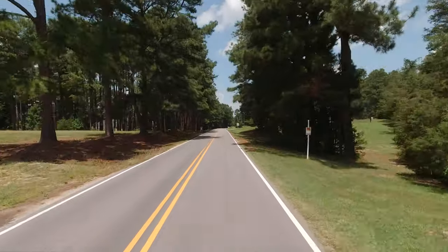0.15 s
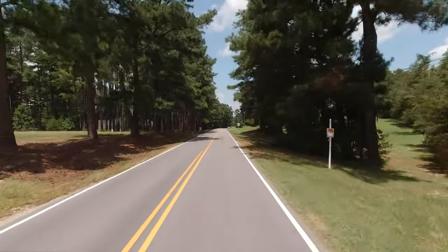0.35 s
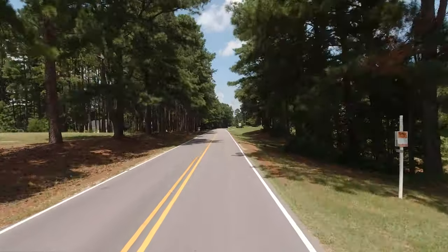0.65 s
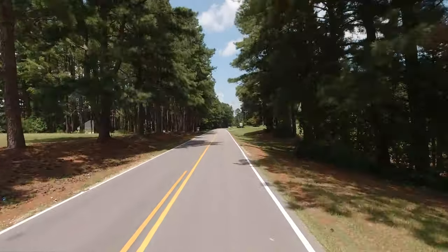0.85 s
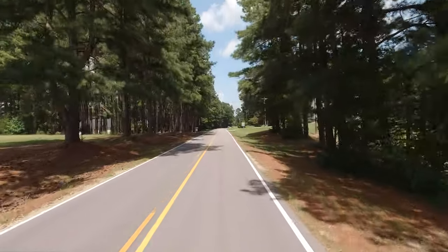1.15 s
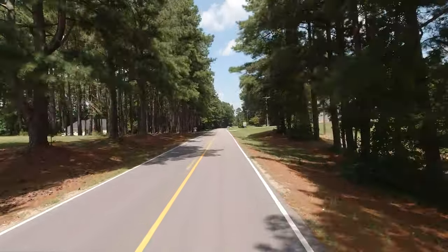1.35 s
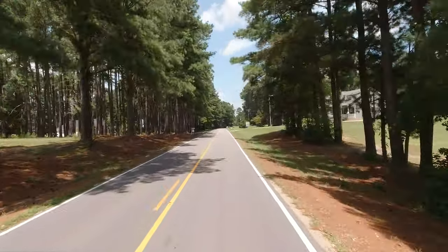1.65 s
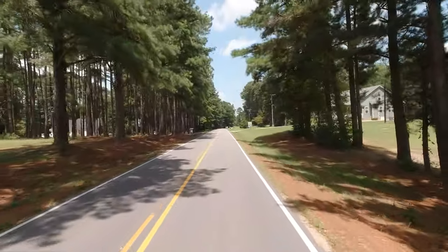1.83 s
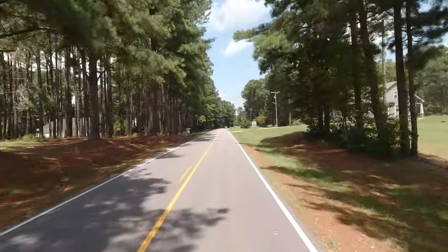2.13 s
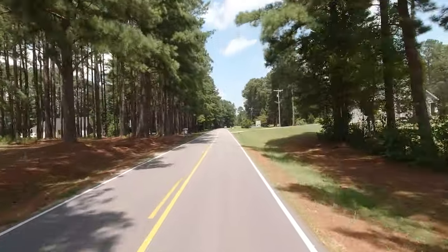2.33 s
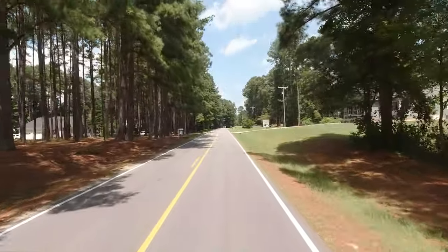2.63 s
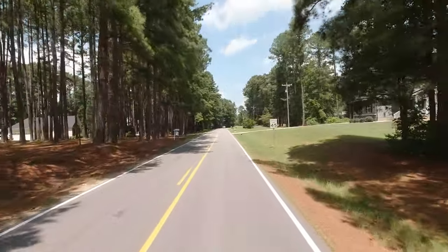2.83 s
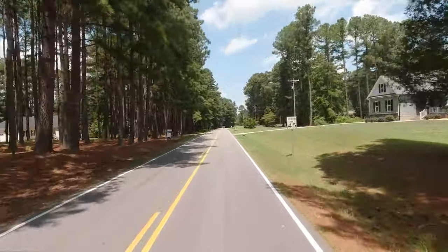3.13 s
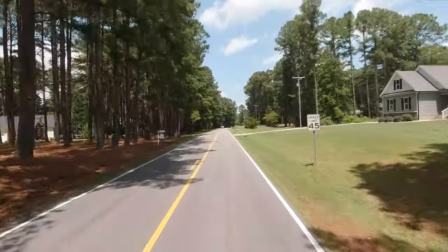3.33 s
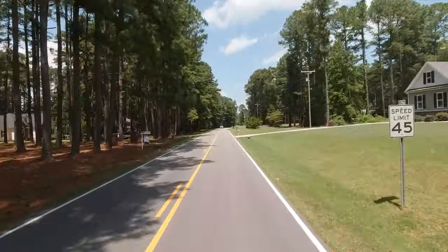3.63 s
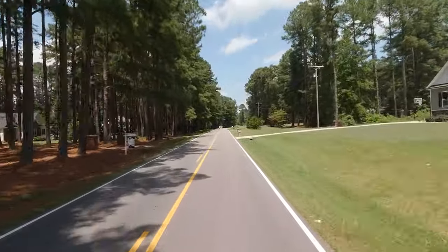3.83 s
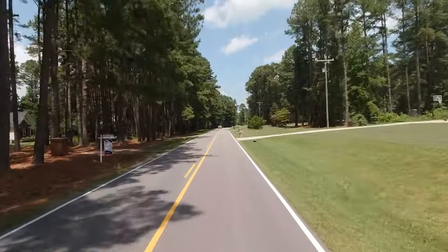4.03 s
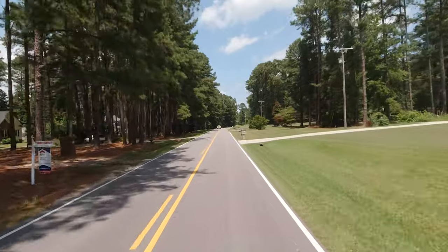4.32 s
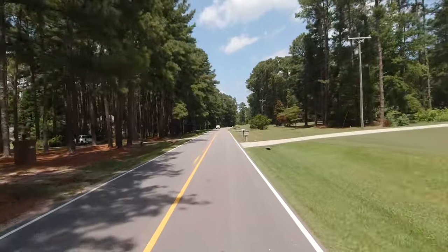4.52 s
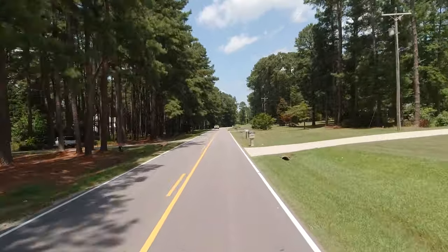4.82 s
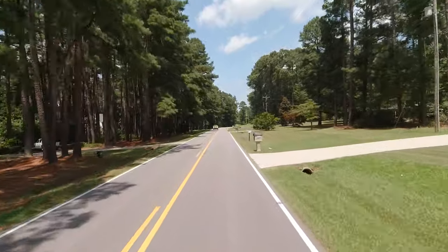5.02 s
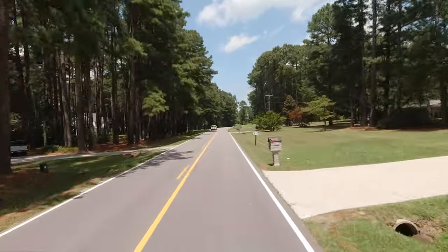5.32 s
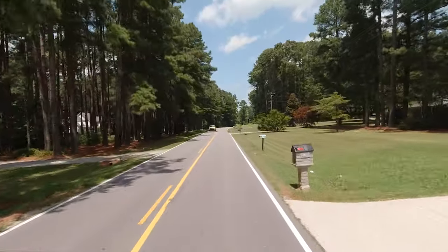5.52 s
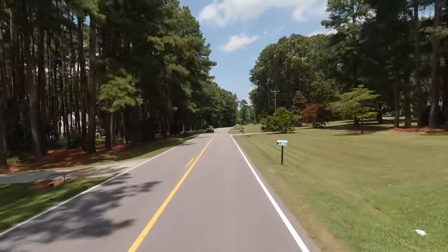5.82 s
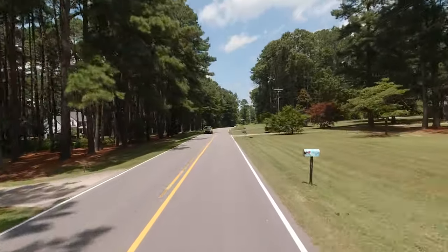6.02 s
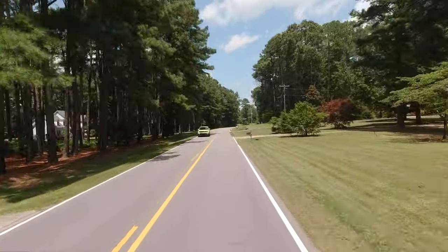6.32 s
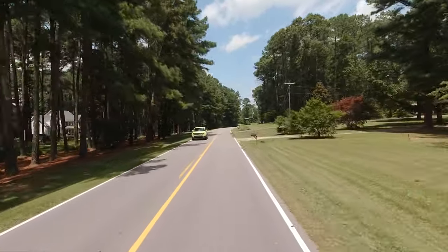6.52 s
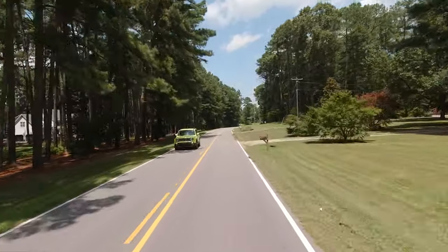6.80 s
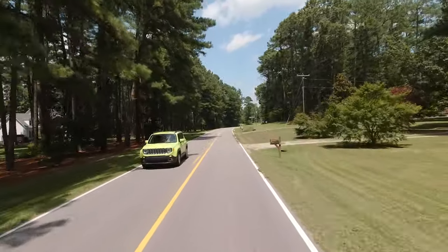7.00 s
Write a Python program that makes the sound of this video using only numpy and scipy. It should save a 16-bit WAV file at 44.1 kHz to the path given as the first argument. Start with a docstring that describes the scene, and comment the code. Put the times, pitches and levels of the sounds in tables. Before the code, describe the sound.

A low, pulsing wind throb and steady road boom fill a moving open vehicle as air rushes past the windows.

```python
"""Open-top drive on a country road

Heard from on board: air spilling past the open windows makes the cabin throb near 40 Hz.
Engine and road boom through the body, and the tyres roar and whine.
The slipstream rushes louder on the left and grows brighter; loose trim taps once and squeaks faintly."""
import sys
import numpy as np
from scipy import signal
from scipy.fft import rfft, irfft, next_fast_len
from scipy.io import wavfile
from scipy.ndimage import uniform_filter1d, map_coordinates

SR = 44100
rng = np.random.default_rng(int(sys.argv[2]) if len(sys.argv) > 2 else 0)


def log_audio(samples):
    """Write samples as a 16-bit WAV file to the path given in sys.argv[1]."""
    # one column per channel
    frames = np.atleast_2d(samples).T
    # limit to full scale, then quantise
    limited = np.clip(frames, -1, 1)
    pcm = np.round(limited * 32767).astype(np.int16)
    wavfile.write(sys.argv[1], SR, pcm)


N = 315756

# the deep throb, as the vortices lock on to the cabin and let go: (time [s], level [dB])
THROB_LEVEL = [(0.0, -19.5), (0.25, -29.5), (0.47, -19.5), (0.65, -26), (0.95, -24.5), (1.2, -18),
               (1.8, -20), (2.05, -32.5), (2.27, -18.5), (2.6, -25), (2.95, -36.5), (3.25, -18),
               (3.6, -20.5), (4.0, -20.5), (4.27, -16.5), (4.55, -22), (4.92, -27), (5.17, -22),
               (5.85, -23.5), (6.25, -25.5), (6.7, -16), (7.15, -24.5)]
# brief stalls when the vortices lose their lock: (time [s], width [s], gain [dB])
THROB_STALLS = [(0.72, 0.047, -12), (0.88, 0.03, -14), (1.23, 0.045, -9), (1.44, 0.13, -7),
                (1.96, 0.027, -16), (2.13, 0.053, -5), (2.42, 0.079, -10.5), (3.05, 0.042, -13),
                (3.79, .04, -12), (4.05, 0.066, -10.5), (4.36, 0.019, -10.5), (5.25, 0.045, -15),
                (6.02, 0.065, -15), (6.73, 0.032, -18), (6.84, 0.044, -17), (6.93, 0.071, -6)]
# the boom that shakes the body: (time [s], level [dB])
BOOM_LEVEL = [(0.0, -30.5), (0.7, -28), (1.75, -26.3), (2.0, -28), (2.2, -26.5), (3.0, -26.7), (3.4, -25.8),
              (4.0, -26.4), (4.27, -28), (4.55, -24.5), (4.75, -26), (5.45, -25.3), (5.82, -21.8),
              (6.08, -24), (6.25, -22.8), (6.95, -22.2), (7.15, -25)]
# tone of the boom: (frequency [Hz], level [dB])
BOOM_SPECTRUM = [(12, -24), (22, -1), (34, -0.5), (54, -4.5), (68, -2.5), (92, -4), (130, -7), (175, -9.5),
                 (205, -13), (300, -19.5), (400, -32), (700, -54.5), (3000, -120)]
# tyre roar on the changing asphalt: (time [s], level [dB])
ROAR_LEVEL = [(0.0, -43.5), (1.7, -42.5), (3.1, -42), (4.05, -41.5), (4.7, -42.5), (5.45, -40), (6.1, -41),
              (6.8, -42)]
# tone of the roar: (frequency [Hz], level [dB])
ROAR_SPECTRUM = [(40, -62.5), (130, -23.5), (220, -0.5), (300, 2), (400, -0.65), (600, -3.5), (900, -10.5),
                 (1200, -15), (1800, -25), (4000, -60.5), (12000, -120)]
# the tyre whine follows the road speed: (time [s], pitch [Hz])
WHINE_PITCH = [(0.0, 840), (1.0, 848), (2.5, 855), (3.9, 849), (5.5, 857), (7.15, 866)]
# tread notes: (multiple of the pitch, width [Hz], level against the roar [dB], left minus right [dB])
WHINE_NOTES = [(0.652, 16, -12.5, 1.5), (0.978, 45, -13, 2), (1.008, 28, -14, 6), (2.01, 40, -21, 7.5)]
# the whine flares or sinks with the grain of the road: (time [s], width [s], gain [dB])
WHINE_SWELLS = [(0.1, 0.4, -3), (2.15, 0.11, 4), (3.15, 0.5, 1.5), (5.1, 0.23, 3), (5.8, 0.7, -1.5)]
# strength of the airflow past the vehicle: (time [s], gain [dB])
AIRFLOW = [(0.0, 1.2), (0.9, -1.3), (2.3, -0.5), (2.9, 0), (3.45, 0.7), (4.7, 0), (5.15, 1.1), (5.45, 2.0),
           (6.3, 1.3), (6.6, 2), (6.9, 2.5), (7.15, 4)]
# gusts and lulls in the slipstream, and one very short burst of noise: (time [s], width [s], gain [dB])
GUSTS = [(0.19, 0.15, -3), (0.62, 0.081, 0.2), (1.02, 0.098, 1.5), (1.7, 0.34, 1), (4.19, 0.14, 0.5),
         (5.62, 0.12, 1), (6.02, 0.05, 0.3), (6.544, 0.018, 3)]
# tone of the air rushing through the windows: (frequency [Hz], level [dB])
RUSH_SPECTRUM = [(100, -58), (500, -24.5), (900, -3.5), (1300, 4), (1650, -1), (2100, -4.5), (2600, -10),
                 (3400, -12.5), (4400, -19.5), (5300, -26.5), (6500, -35), (14000, -89.5)]
# tone of the hiss on their edges: (frequency [Hz], level [dB])
HISS_SPECTRUM = [(500, -60), (2500, -15), (5000, -2), (6900, -2), (8100, 0), (9200, 0), (10300, -4),
                 (11500, -3), (12000, -4), (12600, -8), (13700, -9), (14300, -12), (15700, -13)]
# the hiss rises or falls for a while: (time [s], width [s], gain [dB])
HISS_SWELLS = [(5.45, 0.35, -0.3), (6.2, 0.44, 1.5), (6.78, 0.35, 2.5), (7.12, 0.2, -2.5)]
# modes of the loose trim panel: (frequency [Hz], level [dB], time to fall 60 dB [s])
TAP_MODES = [(700, -3, 0.011), (1000, 0, 0.011), (1620, -5, 0.01)]
# modes of its rubbing joint: (frequency [Hz], width [Hz], level [dB])
SQUEAK_MODES = [(7620, 70, -4), (8075, 60, -4), (8620, 60, 0), (9135, 53, 2)]
# cabin resonances: (frequency [Hz], width [Hz], left gain [dB], right gain [dB])
CABIN_MODES = [(125, 11, 7, 5), (170.6, 21, 4.5, 0), (350, 55, -3, 2), (420, 38, 1.5, 1.5), (548, 98, 3, 5),
               (600, 39, -3, 1.5), (716, 220, 4.5, 0.5), (810, 77, 1, 5.5), (950, 53, 3, 1.5),
               (1060, 44, -2.5, 2.5), (1192, 57, -6.5, -5.5), (1250, 61, 0.5, -4.5), (1384, 100, -3.5, -2),
               (1450, 32, 2, -1), (1720, 56, 3.5, -3.5), (1770, 35, -3.5, -2), (1830, 69, 3, 1),
               (3480, 190, 1.5, 0), (3940, 220, -3.5, 3.5), (4500, 610, 2.5, -1.3), (5240, 340, -2, 1.5)]
# how alike the two sides sound: (frequency [Hz], correlation [-1 to 1])
STEREO_LIKENESS = [(40, 0.48), (70, 1), (180, 0.85), (250, 0.27), (330, 0.57), (400, -0.41), (740, -0.42),
                   (900, 0.16), (1500, -0.16), (3000, 0.0055)]
# lean towards the nearer window: (frequency [Hz], left minus right [dB])
LEFT_LEAN = [(40, 0.5), (55, 4.5), (85, 7.5), (125, 0), (250, 3), (420, 1.5), (1100, 2.5), (1600, 6),
             (2050, 5.5), (2600, 0.5), (3600, 5.5), (7000, 2), (13000, 4)]

SIDES = np.array([[.5], [-.5]])  # splits a difference between left and right


def buffeting(flow_db):
    """Vortices shed at the windows pump two low cabin modes, which beat and stall together."""
    throb_db, = curves(THROB_LEVEL)
    deep = amp(throb_db) * air_mode(hz=37.95, drift_hz=4.17, lumpy_db=2.2, swell_db=-0.2)
    upper = amp(-27.5 + 0.8 * flow_db) * air_mode(hz=50.47, drift_hz=3.47, lumpy_db=3.5, swell_db=1.5)
    return amp(swells(THROB_STALLS)) * (deep + upper)


def air_mode(hz, drift_hz, lumpy_db, swell_db):
    """Cabin air rings under the vortices: cycles vary in length and strength, and swell in groups."""
    phase = 2 * np.pi * np.cumsum(hz + drift_hz * wobble(16)) / SR
    strength_db = lumpy_db * wobble(30) + swell_db * np.tanh(wobble(3.6))
    return unit(np.sin(phase) * amp(strength_db))


def body_boom(left_lag_s):
    """Engine, wheels and wind shake the body; the boom reaches the left side slightly later."""
    level_db, = curves(BOOM_LEVEL)
    boom = amp(level_db + 0.15 * wobble(9.2)) * cabin_noise(BOOM_SPECTRUM, patchy_db=0.14)
    return filtered(boom, lambda hz: np.exp(-2j * np.pi * SIDES * hz * left_lag_s))


def tyre_roar(roar_db):
    """The tyres roar on the grain of the asphalt."""
    return amp(roar_db) * cabin_noise(ROAR_SPECTRUM, patchy_db=0.06)


def tyre_whine(roar_db, waver_hz, uneven_db):
    """Tread blocks of unequal length sing fuzzy notes that waver with road speed and ride the roar."""
    pitch, = curves(WHINE_PITCH)
    phase = 2 * np.pi * np.cumsum(pitch + waver_hz * wobble(5)) / SR
    notes = 0
    for multiple, width, db, lean_db in WHINE_NOTES:
        gain = amp(db + uneven_db * wobble(3.5) + lean_db * SIDES)
        notes += gain * np.array([fuzzy_note(multiple * phase, width) for _ in range(2)])
    return amp(roar_db + swells(WHINE_SWELLS)) * notes


def slipstream(flow_db, flutter_db):
    """Air rushes through the windows and hisses on their edges, brighter as the flow grows."""
    eddies_db = swells(GUSTS) + flutter_db * unit(wobble(22) + wobble(70))
    rush = amp(-50 + flow_db + eddies_db) * cabin_noise(RUSH_SPECTRUM, patchy_db=0.6)
    hiss_db = -75.5 + 1.75 * flow_db + 1.4 * eddies_db + swells(HISS_SWELLS)
    return rush + amp(hiss_db) * cabin_noise(HISS_SPECTRUM, patchy_db=0.5)


def trim_tap(start_s, level_db, attack_s, lean_db):
    """A bump makes padded trim knock: a soft contact into a few heavily damped modes."""
    age = np.maximum(np.arange(N) / SR - start_s, 0)
    ring = sum(amp(db - 60 * age / t60) * np.sin(2 * np.pi * hz * age) for hz, db, t60 in TAP_MODES)
    return amp(level_db + lean_db * SIDES) * (1 - np.exp(-age / attack_s)) * ring


def trim_squeak(start_s, level_db, attack_s, hold_s, release_s):
    """A rubbing joint swells, holds and fades in a few thin, high modes."""
    corners = start_s + np.cumsum([0, attack_s, hold_s, release_s])
    rubbing = np.interp(np.arange(N) / SR, corners, [0, 1, 1, 0])
    modes = lambda hz: sum(amp(db) * bell(hz, centre, width) for centre, width, db in SQUEAK_MODES)
    return amp(level_db) * rubbing * unit(filtered(rng.standard_normal((2, N)), modes))


def cabin_noise(spectrum, patchy_db):
    """Stereo noise with drifting patches of gain, coloured by the cabin; its mid has rms 1."""
    bands = signal.stft(rng.standard_normal((2, N)), nperseg=512)[2]
    patches = uniform_filter1d(rng.standard_normal(bands.shape), size=9, axis=1)  # across frequency
    patches = uniform_filter1d(patches, size=12, axis=2)  # across time
    noise = signal.istft(bands * amp(patchy_db * unit(patches)), nperseg=512)[1][:, :N]
    spread = lambda hz: np.sqrt(1 + 2 * SIDES * np.clip(along(STEREO_LIKENESS, hz), -.99, .99))
    mid, side = filtered(noise, lambda hz: amp(along(spectrum, hz)) * spread(hz))
    stereo = filtered(np.array([mid + side, mid - side]), cabin_colour)
    return stereo / np.std(stereo.mean(axis=0))


def cabin_colour(hz):
    """Left and right gain from standing waves and from the nearer window on the left."""
    lift_db = sum(np.outer([left, right], bell(hz, centre, width))
                  for centre, width, left, right in CABIN_MODES)
    return amp(lift_db + SIDES * along(LEFT_LEAN, hz))


def fuzzy_note(phase, width_hz):
    """A narrow band of noise around a moving pitch."""
    return unit(wobble(width_hz) * np.cos(phase) + wobble(width_hz) * np.sin(phase))


def swells(rows):
    """Bell-shaped rises and dips over time, in dB."""
    t = np.arange(N) / SR
    return sum(db * .5 ** ((2 * (t - time) / width) ** 2) for time, width, db in rows)


def curves(rows):
    """One envelope for each column after the time."""
    times, *columns = np.transpose(rows)
    return [np.interp(np.arange(N) / SR, times, column) for column in columns]


def wobble(rate):
    """A smooth random curve, rate knots a second."""
    return map_coordinates(rng.standard_normal(int(N * rate / SR) + 4), [np.arange(N) * rate / SR])


def filtered(x, response):
    """Shape x with a frequency response."""
    size = next_fast_len(N + SR // 2)
    return irfft(rfft(x, size) * response(np.fft.rfftfreq(size, 1 / SR)), size)[..., :N]


def along(points, hz):
    """Read a curve on a log frequency axis."""
    freqs, values = np.transpose(points)
    return np.interp(np.log(hz + 1), np.log(freqs + 1), values)


def bell(hz, centre, width):
    """Power response of one resonance."""
    return 1 / (1 + (2 * (hz - centre) / width) ** 2)


def amp(db):
    """Decibels to gain."""
    return 10 ** (np.asarray(db) / 20)


def unit(x):
    """Scale to rms 1."""
    return x / np.sqrt(np.mean(x ** 2) + 1e-20)


def scene():
    """Wind, road and trim together; the throb fills the cabin and sits dead centre."""
    flow_db, = curves(AIRFLOW)
    roar_db, = curves(ROAR_LEVEL)
    whine = tyre_whine(roar_db, waver_hz=6.02, uneven_db=1.5)
    tap = trim_tap(start_s=3.6565, level_db=-21.5, attack_s=0.0015, lean_db=2)
    squeak = trim_squeak(start_s=3.62, level_db=-77, attack_s=0.09, hold_s=0.17, release_s=0.16)
    throb = buffeting(flow_db)
    road = body_boom(left_lag_s=0.0003) + tyre_roar(roar_db) + whine
    return throb + road + slipstream(flow_db, flutter_db=0.52) + tap + squeak


def record(dry):
    """A brick-wall high cut at 15750 Hz."""
    return filtered(dry, lambda hz: hz < 15750)


dry = scene()
out = record(dry)
log_audio(out)
```